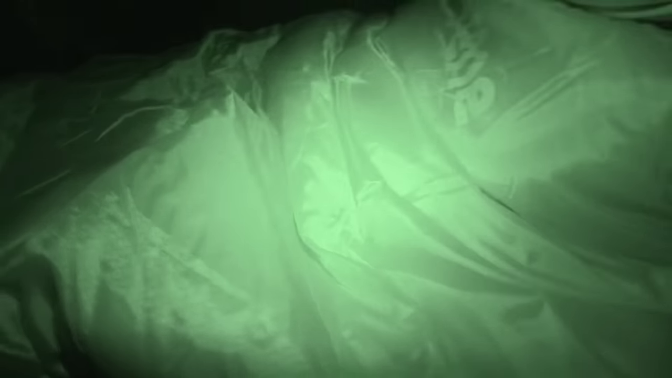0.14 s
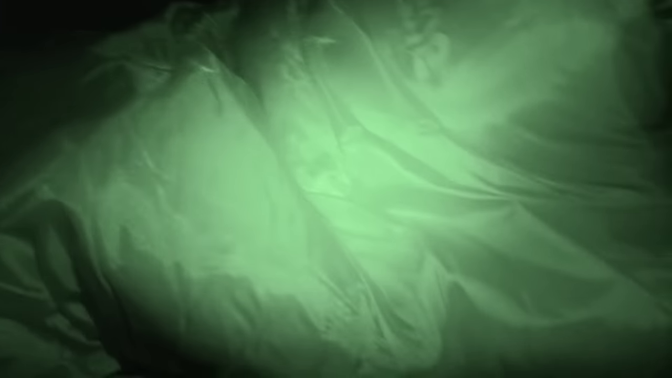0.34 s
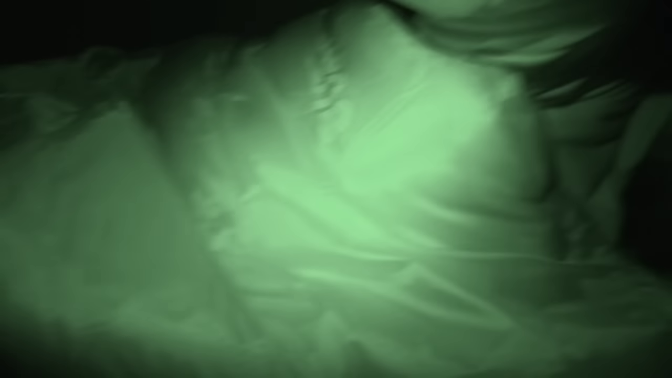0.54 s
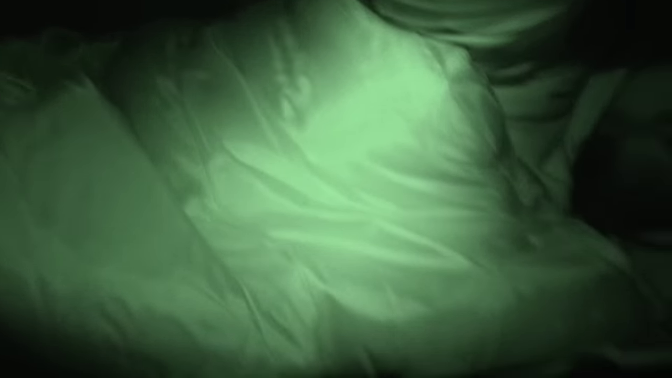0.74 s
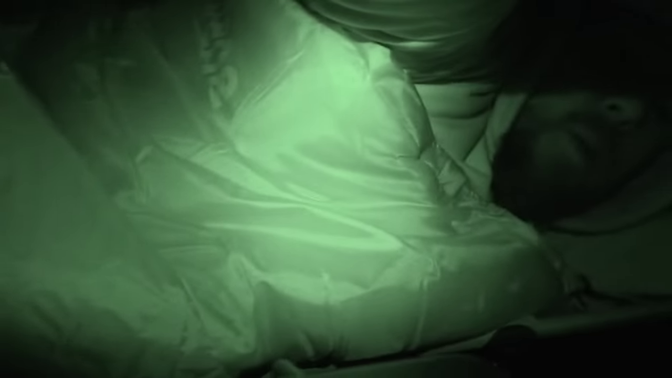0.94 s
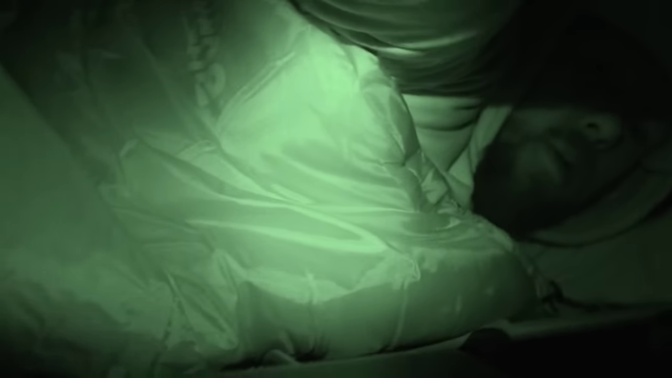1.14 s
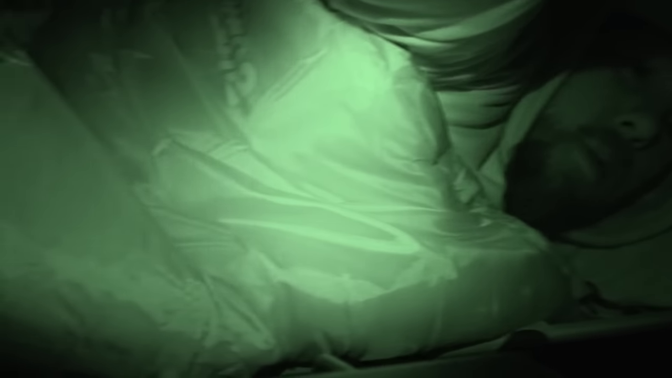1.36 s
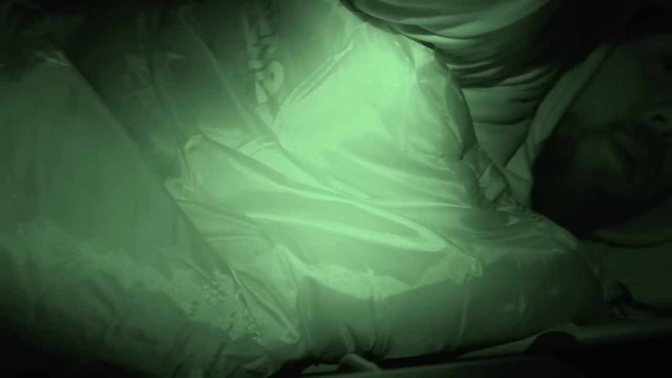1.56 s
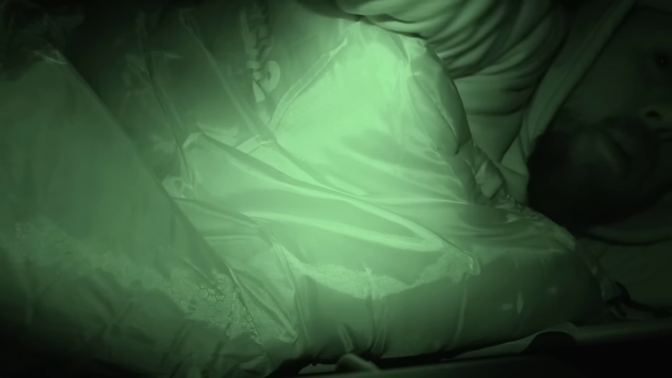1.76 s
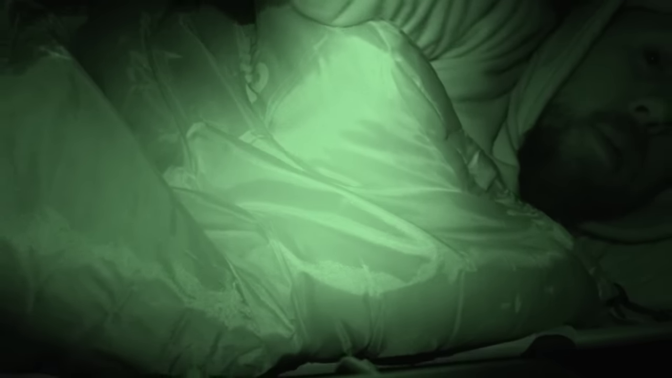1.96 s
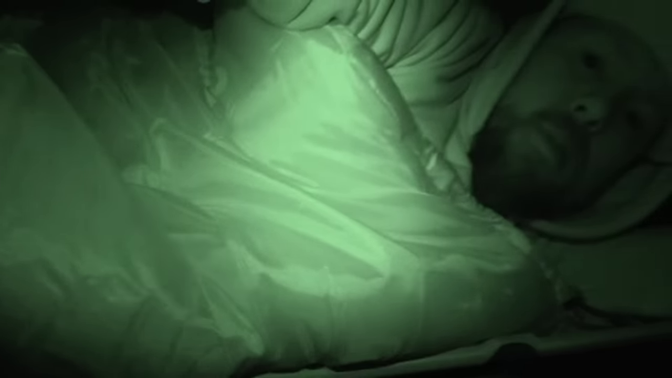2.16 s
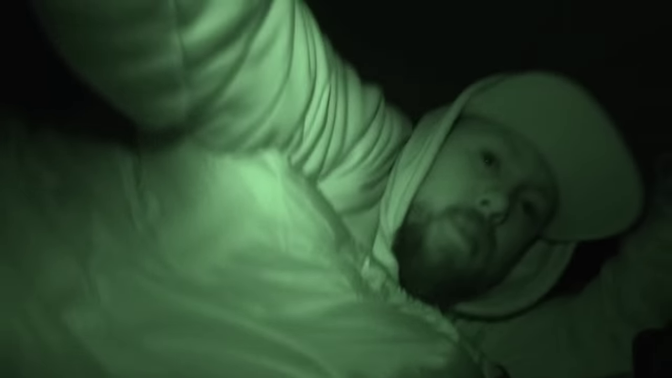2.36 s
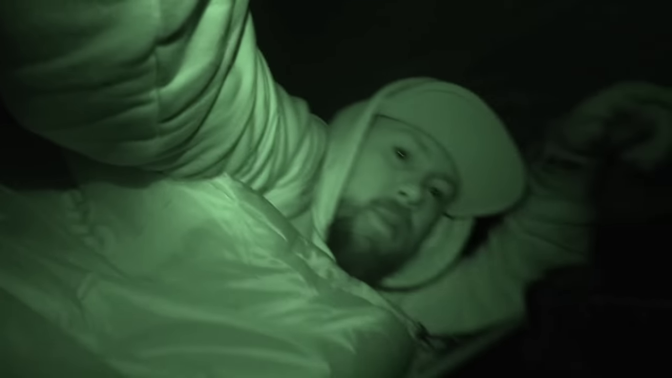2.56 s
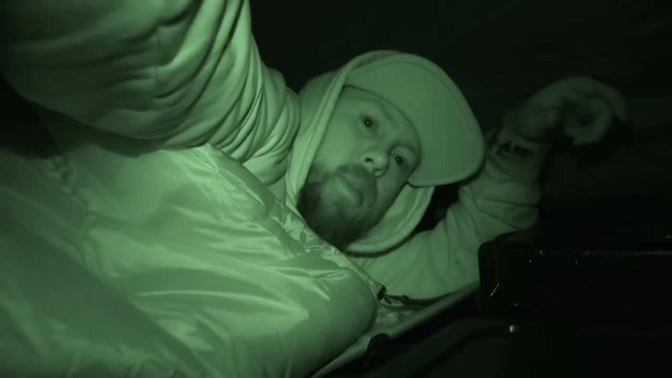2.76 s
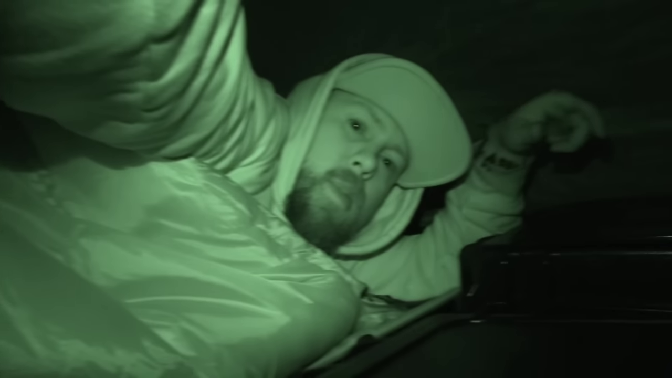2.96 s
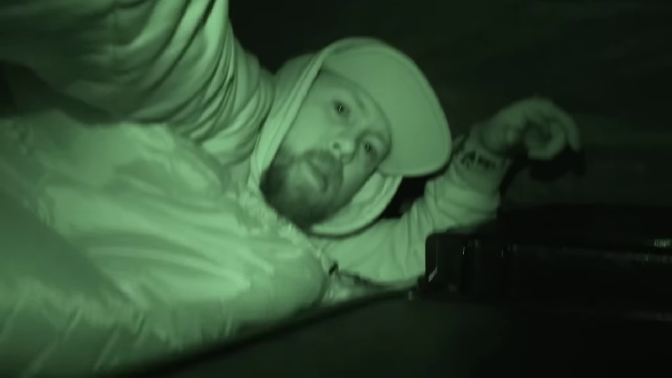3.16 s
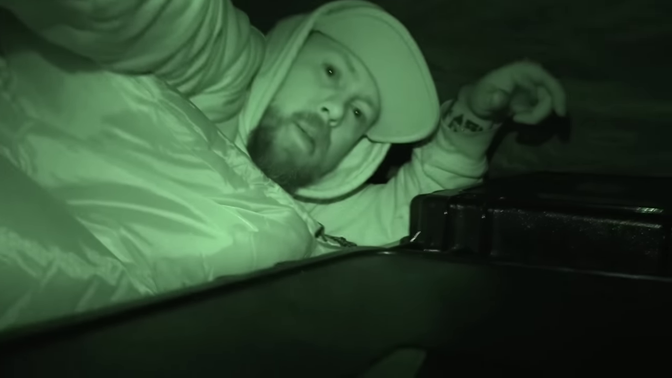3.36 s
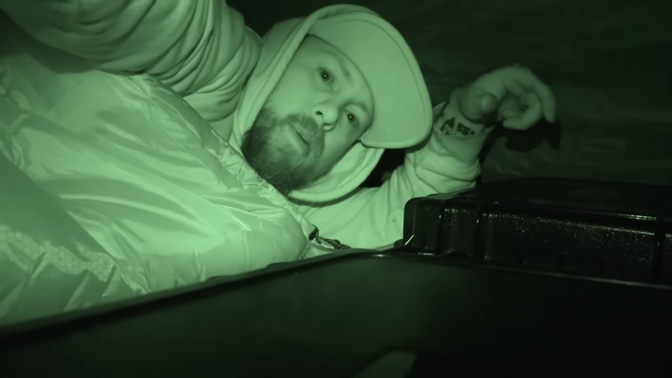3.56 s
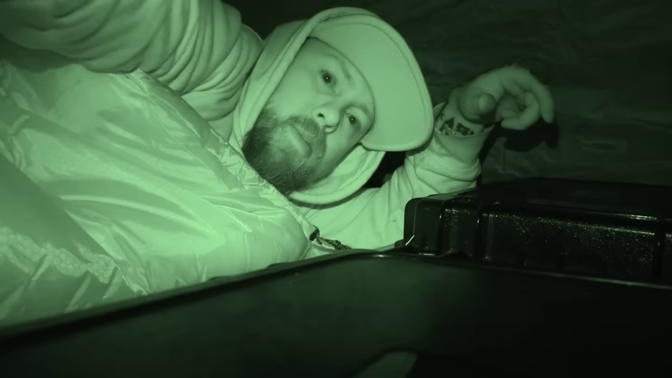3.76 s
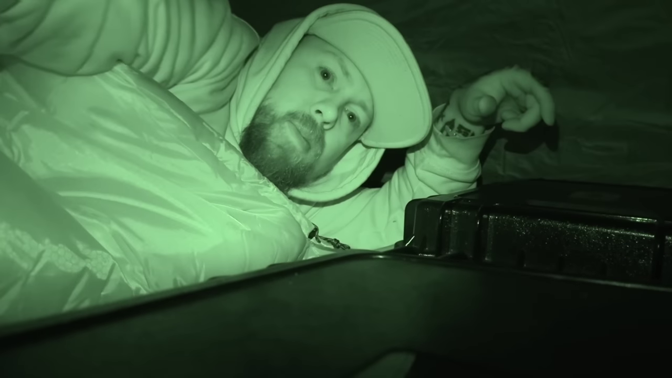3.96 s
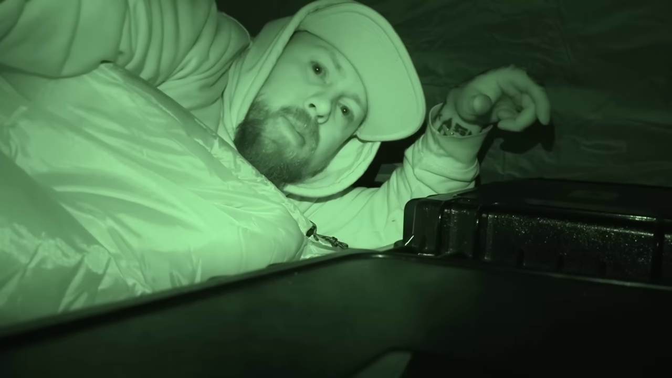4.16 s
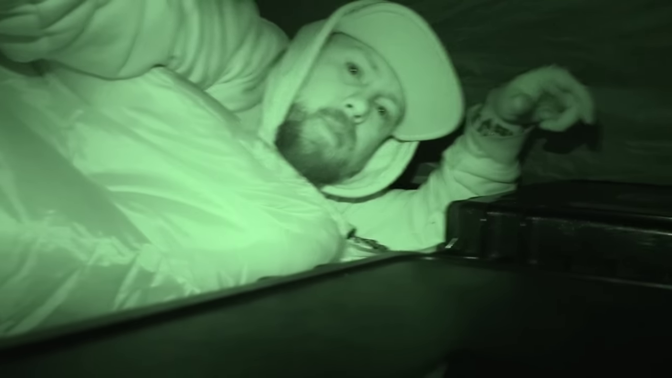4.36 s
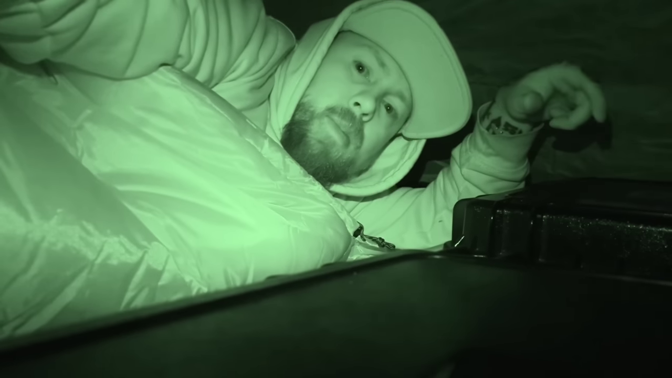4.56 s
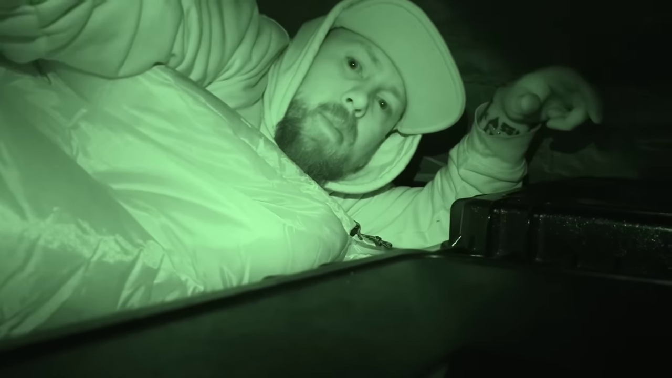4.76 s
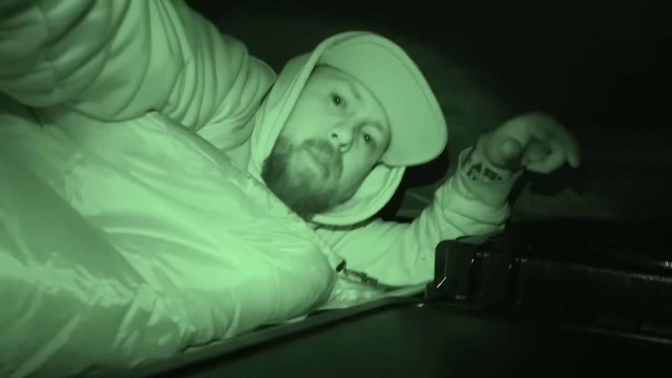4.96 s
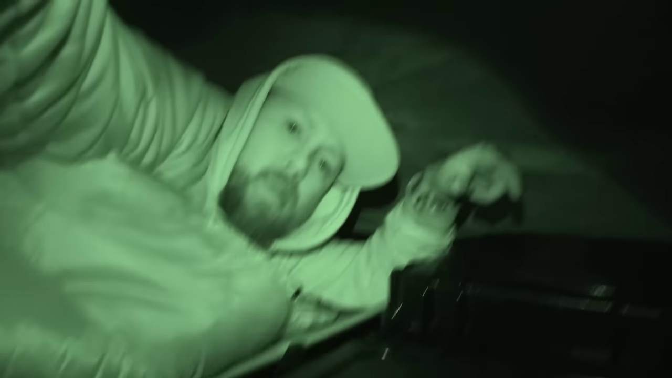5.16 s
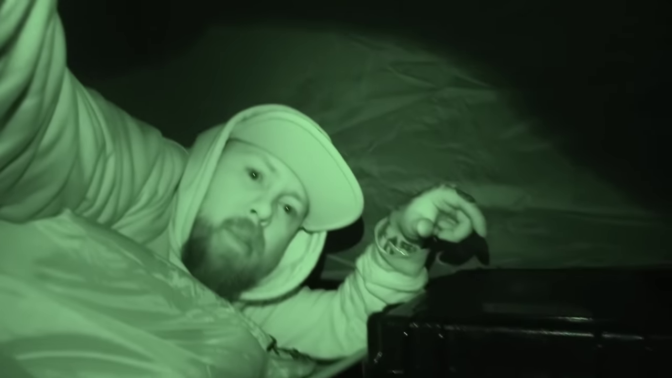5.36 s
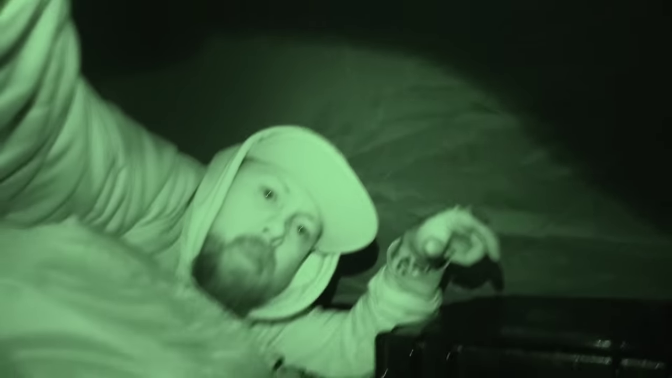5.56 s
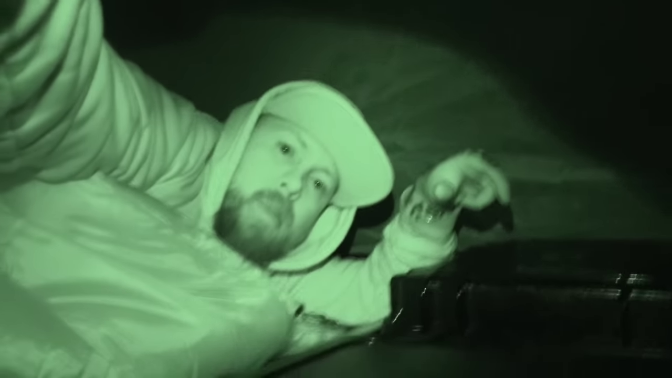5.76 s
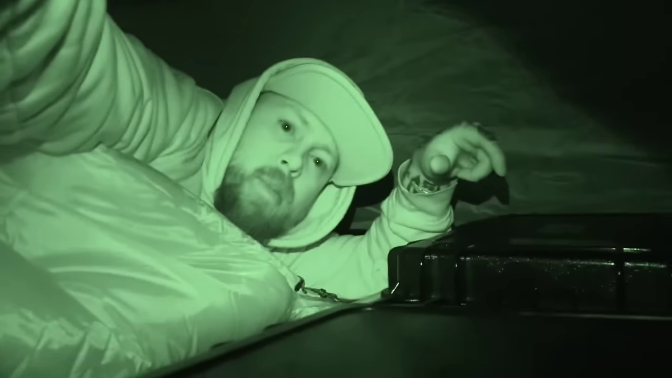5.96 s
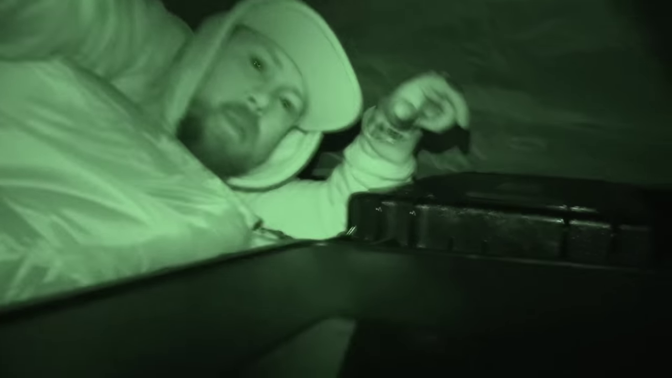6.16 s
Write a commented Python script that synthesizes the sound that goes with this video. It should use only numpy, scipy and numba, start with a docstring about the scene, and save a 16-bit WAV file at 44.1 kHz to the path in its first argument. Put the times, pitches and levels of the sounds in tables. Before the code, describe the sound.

Hollow knocks and small plastic ticks from a hand-held camera, over the soft sliding and crinkling of a nylon sleeping bag.

```python
"""Nylon slides, crinkles and faintly whistles as a sleeper shifts in a tent, over a faint steady noise floor.
Friction on the weave makes broadband noise, and creases snap through as clicks. The grip on a hand-held camera
excites its modes and the air inside; bumps ring the hollow body, and a stiff joint of the mount ticks by stick-
slip. Gain control ducks after loud bumps."""
import sys
import numpy as np
from scipy import signal
from scipy.fft import rfft, irfft, next_fast_len
from scipy.io import wavfile
from scipy.ndimage import uniform_filter1d
from numba import njit

SR = 44100
rng = np.random.default_rng(int(sys.argv[2]) if len(sys.argv) > 2 else 0)


def transcribe(u):
    """Save the signal u as a 16-bit wav file named by the first command-line argument.

    u: samples, shape (n,) or (channels, n), limited to [-1, 1]; the rate is SR.
    q: integer samples, one column per channel.
    """
    v = np.clip(np.atleast_2d(u).T, -1, 1)
    q = np.round(v * 32767).astype(np.int16)
    wavfile.write(sys.argv[1], SR, q)


N = 273861


def undb(db):
    """Amplitude ratio of a level in decibels."""
    return 10 ** (np.asarray(db) / 20)


def unit(x):
    """Normalisation to rms 1."""
    return x / np.sqrt(np.mean(x ** 2))


def colour(x, spectrum):
    """Zero-phase filtering by rows of (f/Hz, level/dB), interpolated in log frequency."""
    size = next_fast_len(x.shape[-1])
    hz, db = np.transpose(spectrum)
    gain = undb(np.interp(np.log(np.fft.rfftfreq(size, 1 / SR) + 1), np.log(hz), db))
    return irfft(rfft(x, size) * gain, size)[..., :x.shape[-1]]


def minimum_phase(gain):
    """Causality: folding the cepstrum gives a response in which nothing precedes the blow."""
    cepstrum = irfft(np.log(gain + 1e-6))
    half = len(cepstrum) // 2
    cepstrum[1:half] *= 2
    cepstrum[half + 1:] = 0
    return np.exp(rfft(cepstrum))


def wander(rate_hz):
    """Random modulation: straight ramps between Gaussian values, with a spread near 1."""
    hold = int(SR / rate_hz)
    steps = np.repeat(rng.standard_normal(N // hold + 1), hold)
    return 1.2 * uniform_filter1d(steps, hold)[:N]


def add(out, start, sound):
    """Superposition of a short sound at a start time in seconds."""
    i = int(start * SR)
    out[:, i:i + sound.shape[1]] += sound[:, :N - i]


def swell_levels(events, *rest_db):
    """Incoherent addition: the power of each swell adds to the resting levels; the result is in dB."""
    attack, release, edge_db = 0.53, 0.45, 8  # shares of the duration; drop at both ends
    t, power = np.arange(N) / SR, undb(2 * np.array(rest_db))
    for start, duration, *levels_db in events:
        along = (t - start) / duration
        off_peak = np.maximum(0, np.maximum(1 - along / attack, 1 - (1 - along) / release))
        drop_db = np.minimum(edge_db * off_peak ** 2, 99)
        power = power + undb(2 * (np.array(levels_db)[:, None] - drop_db))
    return 10 * np.log10(power)


# Side signal relative to mid: f/Hz, level/dB
SIDE_SPECTRUM = [(60, -51), (300, -17), (1300, -7.5), (2400, -9.5), (6000, -5.5)]
def stereo(mid, other):
    """Partial coherence: a like but unrelated sound enters the difference of two close microphone ports."""
    side = colour(other, SIDE_SPECTRUM)
    return np.array([mid + side, mid - side])


# Spectral densities of firm rubbing, a light slide's sheen and fine hiss: f/Hz, level/dB
RUB_SPECTRUM = [(290, -15.5), (500, -15), (611, 2), (1270, -3), (2780, -10.5), (3570, -9.5), (5500, -20.5),
                (7150, -30), (12100, -120)]
SHEEN_SPECTRUM = [(1200, 6), (2200, 5.5), (2550, 5), (2950, 10), (3350, -6), (3900, -3), (6000, -56)]
HISS_SPECTRUM = [(3000, 0.5), (5200, -0.5), (6300, -2), (7500, -0.5), (8800, -6.5), (10500, -5.5),
                 (12500, -13.5), (15000, -39)]
# The sleeper's slow shifting: t/s, rub drive/dB, hiss level/dB, grip rumble level/dB
SHIFTING = [(0, -46, -45.5, -47), (0.45, -42, -43, -45), (0.88, -41.5, -44.5, -41.5), (1.0, -40, -52, -33),
            (1.35, -40.5, -52.5, -44), (1.6, -48, -56.5, -51.5), (1.78, -54, -51, -49),
            (2.07, -44, -40, -62.5), (2.3, -58, -68, -47.5), (2.45, -50, -58, -57),
            (2.9, -57.5, -53.5, -54), (3.3, -43.5, -53, -44.5), (3.4, -56, -73, -49),
            (3.62, -57.5, -58, -58), (3.9, -53.5, -57, -57.5), (4.68, -55, -57.5, -51),
            (4.95, -42.5, -57, -44), (5.12, -57.5, -55, -51.5), (5.5, -70, -61, -46.5),
            (5.75, -59, -69, -50.5), (6.03, -59.5, -76, -45), (6.21, -47, -49.5, -63.5)]
# Quick swipes of sleeve on cloth: t/s, duration/s, rub drive/dB, hiss level/dB
SLEEVE_SWIPES = [(0.963, 0.045, -30.5, -43), (1.062, 0.029, -36.5, -60), (1.18, 0.077, -35.5, -63),
                 (1.473, 0.047, -37.5, -52), (1.85, 0.036, -63, -47), (2.158, 0.076, -27, -44),
                 (2.96, 0.049, -30, -41), (3.175, 0.14, -36, -55.5), (3.433, 0.13, -43, -64),
                 (3.927, 0.14, -45, -50.5), (4.111, 0.072, -43.5, -45), (4.36, 0.12, -55, -58),
                 (4.69, 0.19, -55, -46.5), (4.75, 0.031, -66, -38.5), (5.638, 0.04, -29.5, -64),
                 (5.845, 0.084, -38, -54), (5.921, 0.033, -32.5, -48)]
def nylon(rest_rub_db, rest_hiss_db):
    """Sliding friction and buckling: three bands of fibre noise flicker together and click at creases."""
    snaps_per_s, snap_t60_s = 110, 0.014
    rub_db, hiss_db = swell_levels(SLEEVE_SWIPES, rest_rub_db, rest_hiss_db)
    onsets = rng.random(N) < snaps_per_s / SR
    snap_db = np.minimum(3 * rng.exponential(size=N), 7) - 1
    snaps = signal.lfilter([1], [1, -undb(-60 / (snap_t60_s * SR))], onsets * undb(snap_db))
    flicker = undb(1.2 * wander(45))
    # a firm slide drags the whole cloth, so the drag grows faster than the sheen
    drag_db = rub_db + 0.56 * (rub_db + 44.5) - 7
    out = 0
    for spectrum, level_db, crinkle in ((RUB_SPECTRUM, drag_db, 1.5),
                                        (SHEEN_SPECTRUM, rub_db - 3, 1.2),
                                        (HISS_SPECTRUM, hiss_db + 2.2 * wander(14), .3)):
        friction = rng.standard_normal((2, N)) * (flicker + crinkle * snaps)
        mid, other = colour(friction, spectrum)
        out = out + stereo(mid, other) / np.std(mid) * undb(level_db)
    return out


# Light glides of a sleeve along the weave: t/s, duration/s, level/dB, whistle f/Hz
SLEEVE_GLIDES = [(0.0, 0.57, -45.5, 2440), (1.85, 0.65, -46.5, 3000), (3.212, 0.12, -42, 1970),
                 (3.92, 0.15, -49.5, 3430), (4.123, 0.058, -42, 2920), (4.38, 0.11, -48, 2950),
                 (4.584, 0.23, -53.5, 3000), (4.71, 0.046, -43, 910), (4.712, 0.035, -40.5, 2310),
                 (4.75, 0.094, -43.5, 3330)]
# Spectral density of the whistle: ratio to whistle frequency, level/dB
WHISTLE_BAND = [(.6, -13), (.85, 2), (1.15, -0.5), (1.42, -41)]
def weave_whistle():
    """Friction on a periodic surface: the weave sings in a narrow noise band, one pitch to a glide."""
    out, silence_db = 0, np.full(N, -150.)
    for start, duration, level_db, hz in SLEEVE_GLIDES:
        friction = rng.standard_normal((2, N)) * undb(2.5 * wander(90))
        mid, other = colour(friction, [(ratio * hz, db) for ratio, db in WHISTLE_BAND])
        envelope = undb(swell_levels([(start, duration, level_db)], silence_db))
        out = out + stereo(mid, other) / np.std(mid) * envelope
    return out


# Normal modes of the camera body: f/Hz, base level/dB, T60/s
BODY_MODES = [(135.6, -8, 0.13), (157.8, 2.5, 0.058), (225, 5, 0.051), (307.6, 2.5, 0.034),
              (373, 5.5, 0.048), (436, 0, 0.053), (514, -2, 0.067), (750, 2.5, 0.093)]
def body_rumble(force):
    """Forced vibration: each body mode is a damped resonator, and the higher ones respond less."""
    rumble = 0
    for hz, mode_db, t60 in BODY_MODES:
        radius = undb(-60 / (t60 * SR))
        poles = [1, -2 * radius * np.cos(2 * np.pi * hz / SR), radius ** 2]
        ring = signal.lfilter([1, -1], poles, force)
        rumble = rumble + undb(mode_db - 9.1 * np.log2(hz / 200)) * unit(ring)
    return stereo(*unit(rumble))


# Squeezes of the hand: t/s, duration/s, rumble level/dB, cavity hum level/dB
GRIP_SQUEEZES = [(0.958, 0.23, -56, -36), (1.291, 0.21, -40, -45), (2.203, 0.209, -42.5, -80),
                 (3.959, 0.25, -48.5, -54.5), (4.773, 0.12, -58, -51), (5.852, 0.15, -41.5, -56)]
def cavity_hum(force):
    """Cavity resonance: the air inside the body hums, rising in pitch while the hand tightens."""
    rest_hz, rise_hz_per_s, t60 = 374., 140, 0.22
    t, hz = np.arange(N) / SR, np.full(N, rest_hz)
    for start, duration, *_ in GRIP_SQUEEZES:
        hz += rise_hz_per_s * (t - start) * (t > start) * (t < start + duration)
    carrier = np.exp(2j * np.pi * np.cumsum(hz) / SR)
    radius = undb(-60 / (t60 * SR))
    steady = np.std(force) / np.sqrt(1 - radius ** 2) * np.array([[1], [0]])  # pure tone, mid only
    driven = signal.lfilter([1], [1, -radius], force / carrier)
    return stereo(*unit(np.real(carrier * (steady + driven))))


def grip(rest_rumble_db):
    """Random excitation: the creeping hand drives body and cavity with one force; squeezes swell them."""
    rest_hum_db = np.full(N, -73.5)
    rumble_db, hum_db = swell_levels(GRIP_SQUEEZES, rest_rumble_db, rest_hum_db)
    force = rng.standard_normal((2, N)) * undb(3 * wander(25))
    return body_rumble(force) * undb(rumble_db) + cavity_hum(force) * undb(hum_db)


# Spectral density of the steady background noise: f/Hz, relative level/dB
FLOOR_SPECTRUM = [(15, -55), (33, -17), (55, 26), (139, 24.5), (673, -20), (879, 16), (1630, -38),
                  (3010, -22), (4620, -40), (10900, -39), (13500, -68.5), (15000, -75)]
def steady_floor(level_db=-62):
    """Stationary noise: a faint low rumble with a soft band in the midrange."""
    noise = colour(rng.standard_normal((2, N)), FLOOR_SPECTRUM)
    return stereo(*unit(noise)) * undb(level_db)


# Bumps on the body: t/s, peak level/dB, main ring f/Hz, deep mode gain/dB, scrape time constant/s
BODY_BUMPS = [(0.037, -24.5, 273, -37, 0.00066), (0.222, -29, 450, -26, 0.0031),
              (0.643, -19.5, 228, -24, 0.0075), (0.933, -7, 381.6, -5.5, 0.042),
              (0.942, -8, 212, -4, 0.044), (1.052, -21, 230, 0, 0.068), (1.196, -17.5, 425, 4, 0.0081),
              (1.271, -8.5, 301, -18, 0.011), (1.351, -22, 317, -24, 0.02), (1.412, -10, 432, -39, 0.0088),
              (2.062, -31.5, 214, -6, 0.012), (2.136, -14.5, 432, -34, 0.023), (2.163, -5, 364, 3.5, 0.012),
              (2.181, -1, 298, -9, 0.013), (2.22, -9, 419, -1, 0.01), (2.958, -6.5, 394, -13, 0.016),
              (2.965, -9.5, 211, -1, 0.014), (3.166, -15.5, 363, -0.5, 0.034),
              (3.446, -32.5, 191, -28, 0.053), (3.475, -18, 178, 2, 0.035), (3.517, -19.5, 286, -21, 0.02),
              (4.321, -28, 295, -5, 0.025), (4.814, -33, 267, -9, 0.016), (4.882, -31, 176, 1.5, 0.0091),
              (4.994, -19, 260.6, -7, 0.019), (5.634, -3.5, 366, -15, 0.014), (5.646, -8, 229, 2, 0.015),
              (5.831, -9, 356, 0, 0.019), (5.925, -19.5, 290, -6.5, 0.0058)]
def bumps(deep_below_hz=170):
    """Impact excitation: a short rough push rings the modes; where it lands sets their weights."""
    out, t = np.zeros((2, N)), np.arange(8192) / SR
    hz, mode_db, t60 = np.transpose(BODY_MODES)[:, :, None]
    build_up = 1 - np.exp(-t * hz / 1.01)  # about one period, so deep modes swell late
    for start, peak_db, ring_hz, deep_db, scrape_s in BODY_BUMPS:
        octaves_off = np.abs(np.log2(hz / ring_hz))
        weight_db = mode_db + np.where(hz < deep_below_hz, deep_db, -29 * octaves_off)
        detune = 1 + .012 * rng.standard_normal((len(hz), 1))
        # the holding hand loads the nearest mode and shifts it
        nearest = np.argmin(np.abs(hz - ring_hz))
        detune[nearest], weight_db[nearest] = ring_hz / hz[nearest], 3
        envelopes = build_up * undb(weight_db - 60 * t / t60)
        ring = np.sum(envelopes * np.sin(2 * np.pi * hz * detune * t), axis=0)
        force = .04 * rng.standard_normal((2, 2048)) * np.exp(-t[:2048] / max(scrape_s, .001))
        force[0, 0] = 1  # the blow that leads the scrape
        mid, other = signal.fftconvolve(force, ring[None], axes=1)
        add(out, start + 0.0012, stereo(mid, other) * undb(peak_db) / np.abs(mid).max())
    # the bumps' deep bass below about 100 Hz is cut
    return signal.sosfilt(signal.butter(4, 100, "high", fs=SR, output="sos"), out)


# Resonances of the plastic shell: f/Hz, bandwidth/Hz, level/dB
SHELL_RESONANCES = [(1200, 250, 2), (2030, 1900, -2.5), (2470, 370, 5), (3090, 380, 4.5), (3950, 880, 10),
                    (5290, 1560, 10), (7350, 920, 9), (10100, 3500, 5.5)]
# Ticks of the joint and snaps of cloth: t/s, midband peak level/dB, centre f/Hz, relative treble/dB
JOINT_TICKS = [(0.042, -29, 674, -23), (0.224, -25.5, 1450, -13), (0.351, -27, 770, -26),
               (0.386, -23.5, 1940, -20), (0.448, -26, 1500, -13), (0.513, -39, 1180, -24),
               (0.554, -18.5, 815, -28), (0.571, -17.5, 2370, -22), (0.645, -9, 1360, -17),
               (0.721, -27, 764, -28), (0.82, -28, 1240, -0.5), (0.935, -3.5, 1540, -10),
               (1.072, -21.5, 1290, -17), (1.193, -20.5, 1270, -17), (1.211, -23, 2900, -8),
               (1.271, -13.5, 1340, -9.5), (1.353, -23.5, 2500, -4.5), (1.413, -23, 1880, -11),
               (2.136, -22, 1850, -20), (2.151, -17, 1960, -10), (2.17, -9, 1310, -9),
               (2.187, -3.5, 1390, -9.5), (2.198, -20, 1020, -13), (2.335, -16.5, 1970, -10.5),
               (2.41, -33.5, 1900, -11), (2.515, -27, 1680, -10.5), (2.572, -32.5, 1100, -11),
               (2.661, -30.5, 2020, -20), (2.715, -28, 2920, -3), (2.927, -17.5, 1920, -1),
               (2.959, -7.5, 1460, -9.5), (3.087, -26.5, 1090, -29), (3.168, -14.5, 1430, -9),
               (3.478, -16.5, 2040, -29), (3.511, -23, 1440, -26), (3.522, -27, 1380, -26),
               (3.537, -26, 1760, -16), (3.656, -42, 3320, 4), (3.716, -24.5, 1980, -7),
               (3.934, -28.5, 2830, -4), (4.325, -29, 1170, -30), (4.81, -17.5, 1660, -14),
               (4.833, -22.5, 1800, -17), (4.907, -25, 2180, -21), (4.931, -32, 1220, -32),
               (4.938, -30, 1200, -25), (4.951, -19, 1180, -15), (4.964, -10.5, 1300, -21),
               (4.975, -11.5, 1350, -19), (4.985, -10, 1300, -18), (4.996, -14.5, 1240, -20),
               (5.002, -11.5, 1620, -20), (5.035, -29, 1180, -24), (5.053, -16.5, 1140, -30),
               (5.075, -22, 1170, -21), (5.147, -34, 1500, -12), (5.255, -28, 2360, -15),
               (5.258, -14, 2450, -8), (5.277, -12, 2520, -5.5), (5.373, -12, 2700, -5.5),
               (5.388, -9.5, 2460, -5.5), (5.413, -9.5, 2420, -9), (5.416, -30, 2500, -14),
               (5.439, -14, 2420, -12), (5.513, -10, 2040, -15), (5.532, -7.5, 2000, -8),
               (5.578, -14.5, 1220, -17), (5.59, -9, 1700, -15), (5.61, -12, 1710, -16),
               (5.637, -3.5, 1300, -3.5), (5.646, -17.5, 1380, -15), (5.834, -9, 1260, -9.5),
               (5.85, -12, 1600, -11), (5.88, -15, 1950, -6), (5.963, -19.5, 1870, -13.5),
               (6.1, -37.5, 2450, -8)]
def ticks():
    """Stick-slip: the joint creeps, lets go and rattles, all filtered by the shell's resonances."""
    creep_s, shared = .0018, .6  # shared: weight of the rattle that every tick repeats
    jolt_s, jolt_db = .02, -16.5  # a bump this recent and this hard shakes a tick loose
    out, t = np.zeros((2, N)), np.arange(4096) / SR
    hz = np.fft.rfftfreq(4096, 1 / SR) + 1
    shell = undb(sum(db / (1 + (2 * (hz - f) / width) ** 2) for f, width, db in SHELL_RESONANCES))
    treble_response = minimum_phase(shell / (1 + (4200 / hz) ** 8) / (1 + (hz / 10500) ** 8))
    panel = undb(-8) / (1 + ((hz - 833) / 90) ** 2)  # every tick also nudges a low panel
    joint = rng.standard_normal(4096) * [[1], [0]]
    for start, peak_db, centre_hz, treble_db in JOINT_TICKS:
        jolted = any(-.002 < start - when < jolt_s and db > jolt_db for when, db, *_ in BODY_BUMPS)
        t60, low_cut_ratio = (0.07, 0.46) if jolted else (0.039, 0.4)
        band = undb(-12.5 * np.abs(np.log2(hz / centre_hz)))
        band /= (1 + (hz / 3800) ** 5) * (1 + (low_cut_ratio * centre_hz / hz) ** 6)
        rattle = shared * joint + np.sqrt(1 - shared ** 2) * rng.standard_normal((2, 4096))
        rattle *= np.minimum(t / creep_s, 1) ** 2 * undb(-60 * t / t60)
        rattle[0, int(creep_s * SR)] = -8.5  # the slip itself
        midband = irfft(rfft(rattle) * minimum_phase((band + panel) * shell))
        treble = irfft(rfft(rattle) * treble_response)
        tick = midband / np.abs(midband[0]).max() + undb(treble_db) * treble / np.abs(treble[0]).max()
        if jolted:
            tick[0] += loose_part(t)
        add(out, start - creep_s / 2, stereo(*tick) * undb(peak_db))
    return out


# Modes of a loose part: f/Hz, level relative to the tick/dB, T60/s
LOOSE_MODES = [(2650, -16, 0.083), (3310, -22.5, 0.088)]
def loose_part(t, rise_s=0.01):
    """Free vibration: a part shaken by a bump rings as exponentially damped sinusoids."""
    ring = sum(undb(db - 60 * t / t60) * np.sin(2 * np.pi * hz * t) for hz, db, t60 in LOOSE_MODES)
    return np.minimum(t / rise_s, 1) * ring


def scene():
    """Linear superposition of all sources; the sleeper's shifting moves both cloth and grip levels."""
    times, *levels = np.transpose(SHIFTING)
    rub_db, hiss_db, rumble_db = [np.interp(np.arange(N) / SR, times, db) for db in levels]
    return steady_floor() + grip(rumble_db) + nylon(rub_db, hiss_db) + bumps() + ticks() + weave_whistle()


@njit
def follow(x, attack_s, release_s):
    """Envelope detection: first-order smoothing with separate time constants for rise and fall."""
    level, envelope = 0., np.empty(len(x))
    for i in range(len(x)):
        level += (x[i] - level) / (SR * (attack_s if x[i] > level else release_s))
        envelope[i] = level
    return envelope


def record(dry):
    """Dynamic compression: gain falls after loud bumps and recovers; peaks round off, the top is cut."""
    threshold_db, right_bias_db, ceiling, cutoff_hz = -31.5, 0.8, .7, 15600
    envelope = follow(np.abs(dry).mean(axis=0), attack_s=0.0072, release_s=.14)
    gain = np.minimum(1, (undb(threshold_db) / (envelope + 1e-9)) ** 0.24)
    ducked = dry * gain * undb([[-right_bias_db / 2], [right_bias_db / 2]])
    rounded = ceiling * np.tanh(ducked / ceiling)
    return signal.sosfilt(signal.ellip(12, .2, 70, cutoff_hz, fs=SR, output="sos"), rounded)


dry = scene()
out = record(dry)
transcribe(out)
```